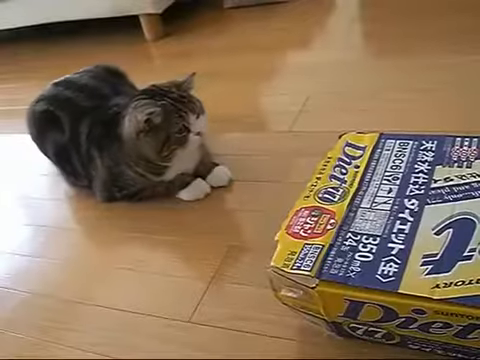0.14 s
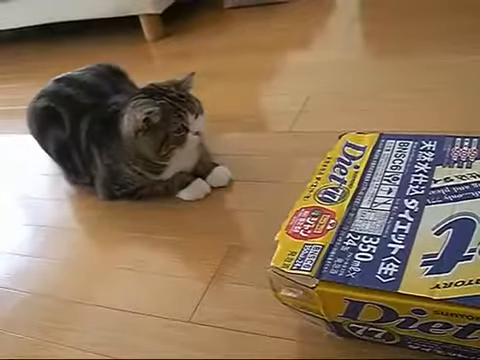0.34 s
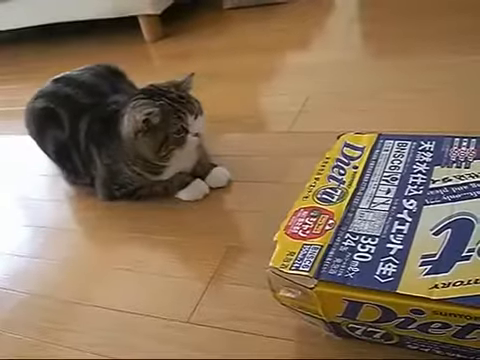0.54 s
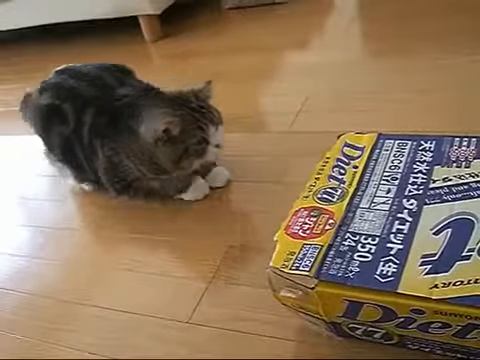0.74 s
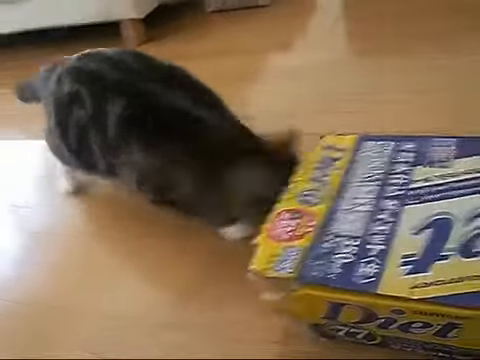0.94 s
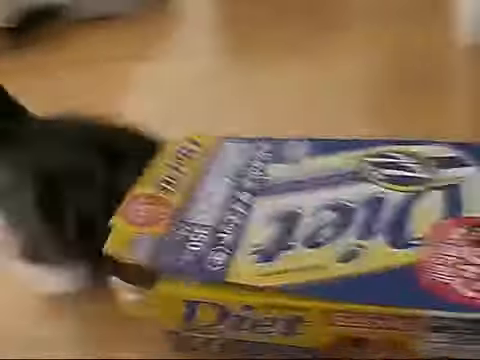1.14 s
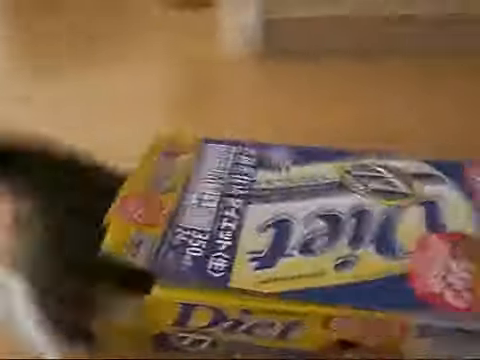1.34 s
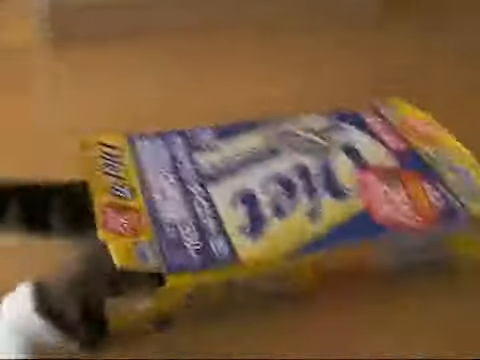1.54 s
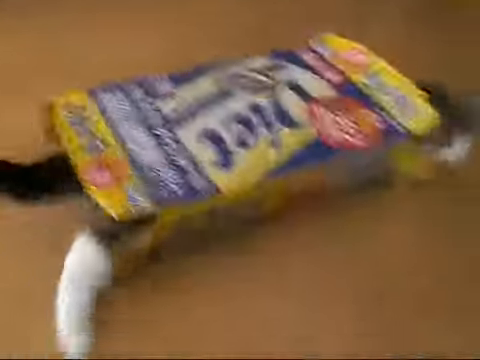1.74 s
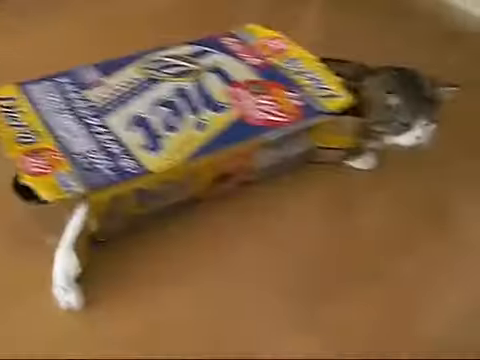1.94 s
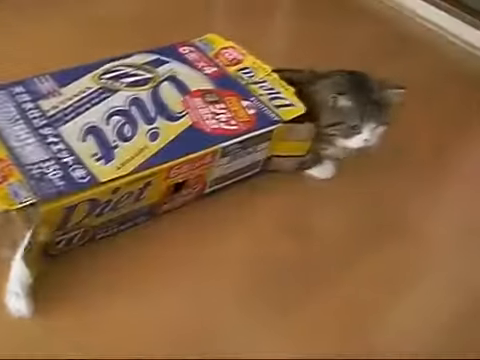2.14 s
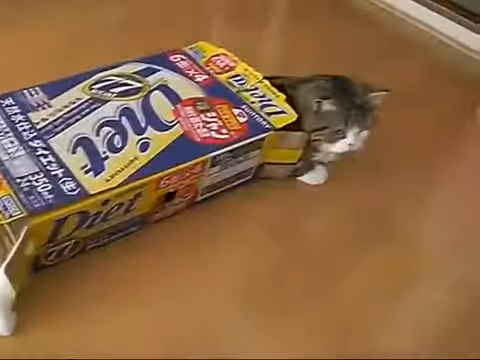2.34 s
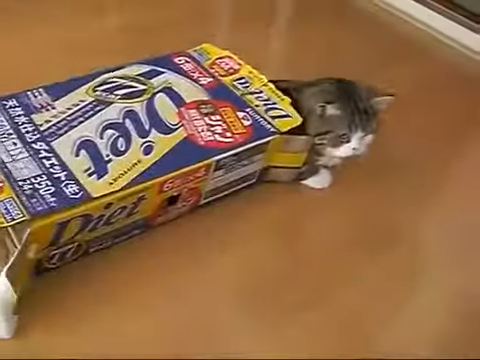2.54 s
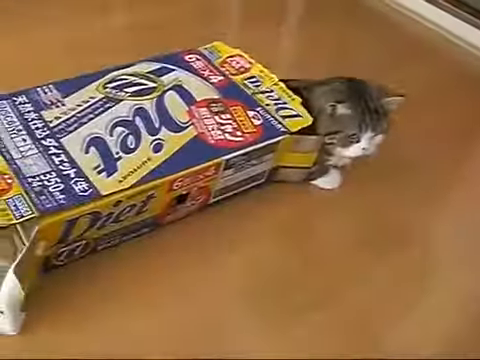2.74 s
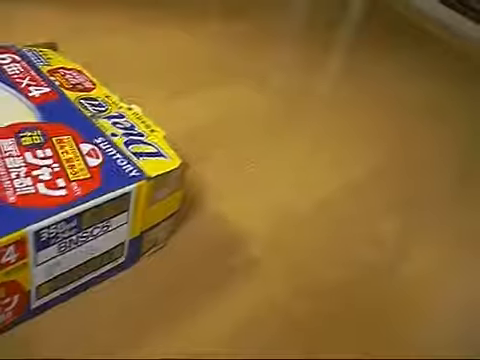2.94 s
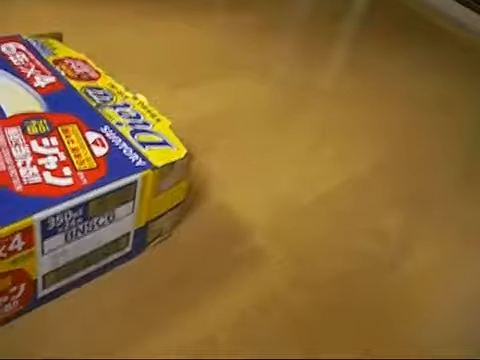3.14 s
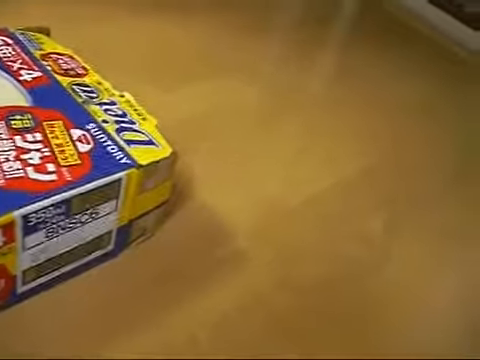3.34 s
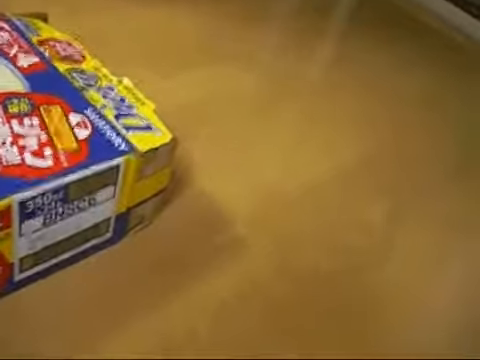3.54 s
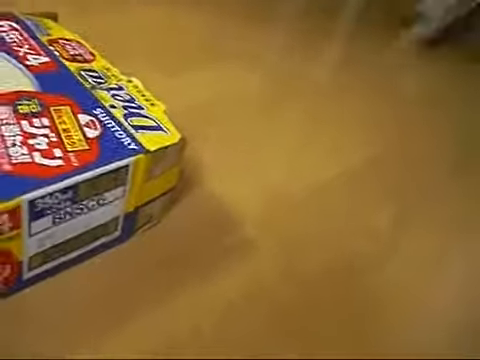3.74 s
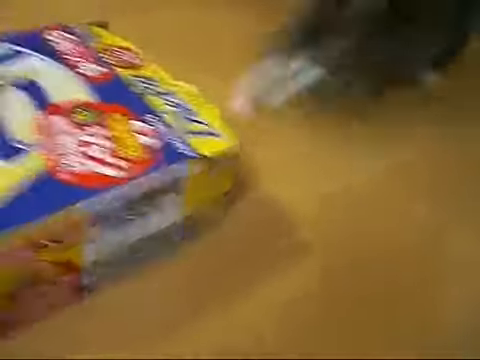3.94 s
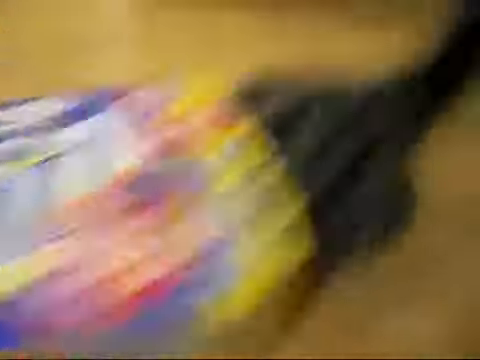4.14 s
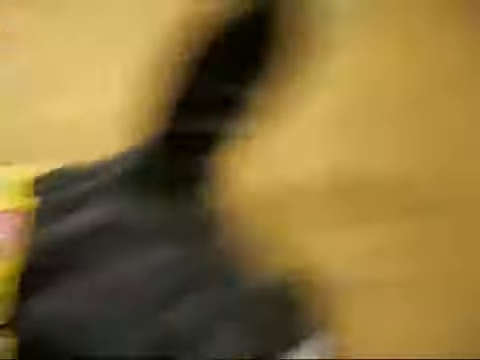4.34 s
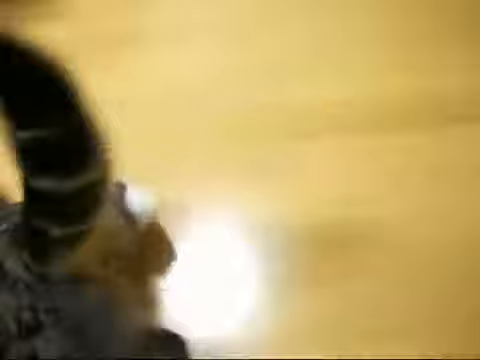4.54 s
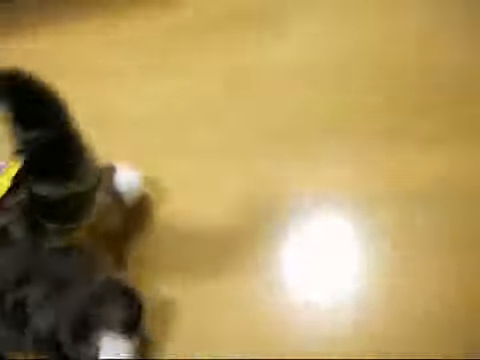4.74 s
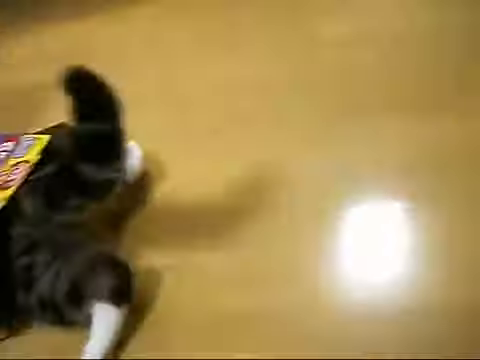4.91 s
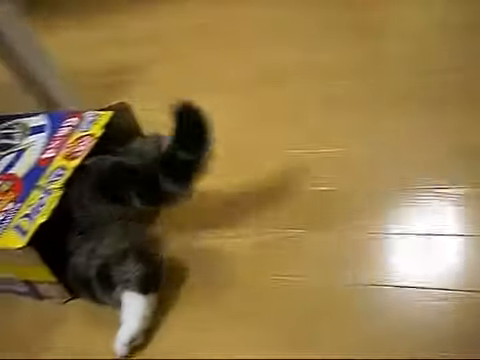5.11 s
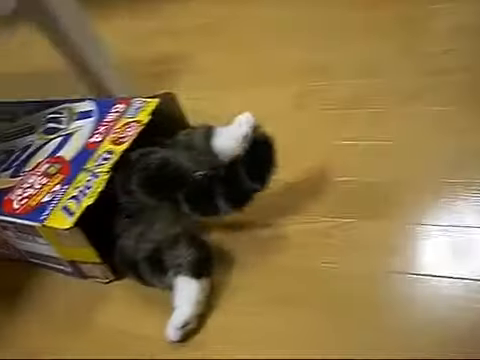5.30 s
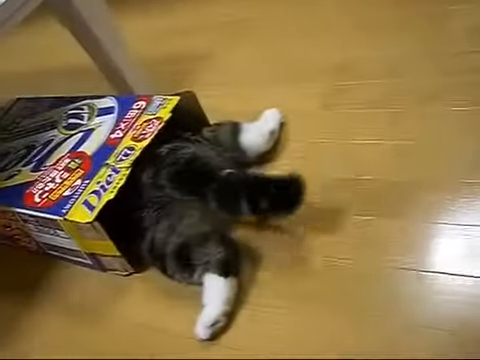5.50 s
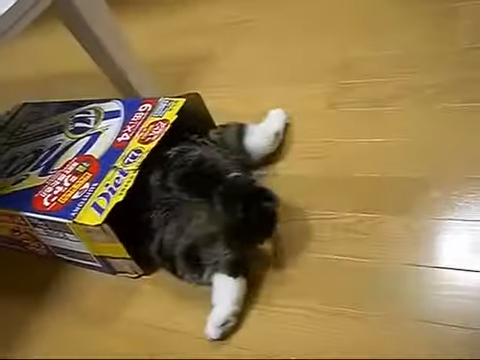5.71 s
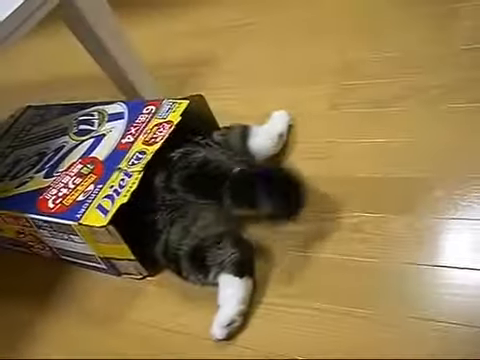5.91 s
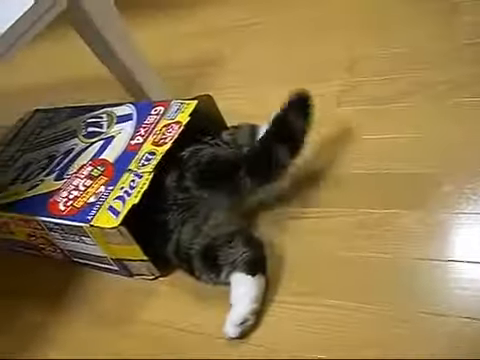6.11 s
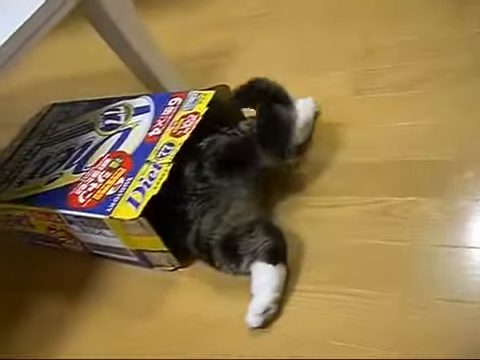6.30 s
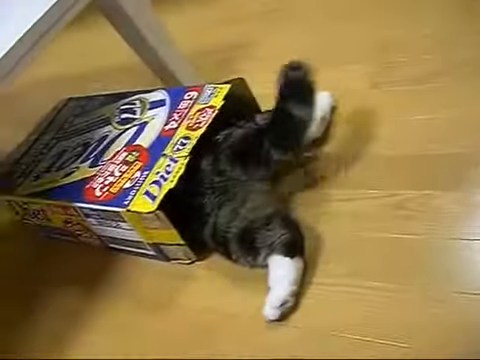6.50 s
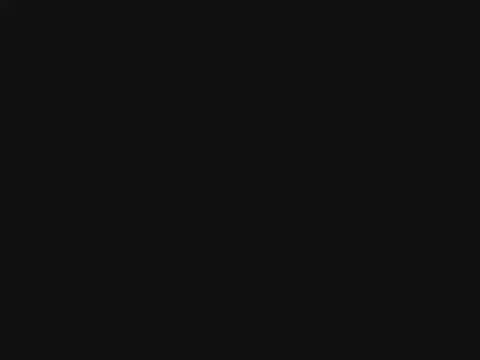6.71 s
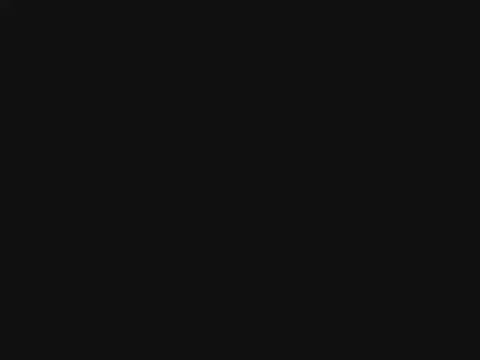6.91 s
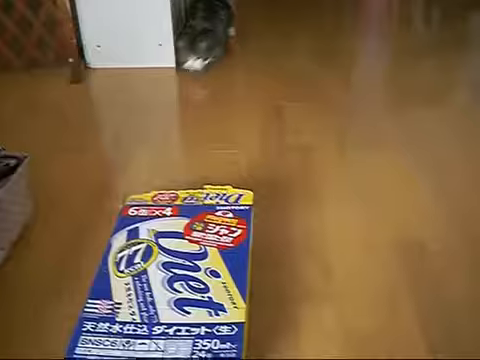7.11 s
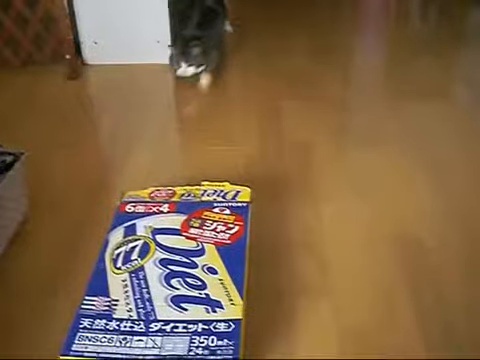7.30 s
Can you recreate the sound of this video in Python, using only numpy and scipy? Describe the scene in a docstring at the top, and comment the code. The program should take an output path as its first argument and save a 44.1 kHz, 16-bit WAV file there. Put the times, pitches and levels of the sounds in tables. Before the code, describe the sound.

A small, dry room with a wooden floor, heard through a modest camera microphone: soft low room noise, faint hum, hiss and rapid tiny treble ticks. About 1.1 s light cardboard taps begin; from 1.28 s a cat hits the box with hollow knocks, the loudest crack at 1.4 s, paws thudding below. The box rumbles and hisses along the varnish, surging to 1.8 s and dying by 2.3 s, with a last small knock. At 2.95 s the background changes abruptly. Soft paw thuds and small rustles come at 3.2 to 3.9 s, one firmer at 3.8 s. At 4.18 s a second hollow bang starts clustered knocks and a strong bright slide, fading from 4.9 to 5.4 s. Quiet room and hum remain, with a faint brush at 5.9 s. Silence from 6.7 to 7.2 s, then a quarter second of faint taps and rustle under pulsing high camera whine.

```python
"""A small furnished room with a wooden floor: a cat dives into a cardboard sleeve and slides it, twice.
Knocks ring the box, paws thud on the boards, sliding rumbles in the panels and hisses on the varnish.
A short, dull room tail sits well under the close sounds, with room tone and hums behind.
A small camera adds ticks, whines, fizz and treble notches to its microphone; both channels are alike.
It runs in three stretches, with silence before the brief last one, which holds only faint taps and rustle."""
import sys
import numpy as np
from scipy import signal
from scipy.fft import rfft, irfft, next_fast_len
from scipy.io import wavfile
from scipy.ndimage import uniform_filter1d

SR = 44100
rng = np.random.default_rng(int(sys.argv[2]) if len(sys.argv) > 2 else 0)


def unload_wav(signal):
    """Save mono or channel-first audio to the path in sys.argv[1] as 16-bit WAV at rate SR, clipped to [-1, 1]."""
    wavfile.write(
        sys.argv[1],
        SR,
        np.round(np.clip(np.atleast_2d(signal).T, -1, 1) * 32767).astype(np.int16),
    )


N = 328805
TIME = np.arange(N) / SR


def undb(db):
    """Amplitude of a level in dB."""
    return 10 ** (np.asarray(db) / 20)


def unit(x):
    """Scale to rms 1."""
    return x / np.sqrt(np.mean(x ** 2))


def colour(x, points):
    """Shape a spectrum by (f/Hz, level/dB) points on a log frequency axis; rms 1."""
    hz, db = np.transpose(points)
    size = next_fast_len(len(x))
    log_hz = np.log(np.arange(size // 2 + 1) * SR / size + 1)
    gain = undb(np.interp(log_hz, np.log(hz), db))
    return unit(irfft(rfft(x, size) * gain, size)[:len(x)])


def walk(rate):
    """Random levels held for 1 / rate seconds and smoothed twice; spread near 1."""
    hold = int(SR / rate)
    steps = np.repeat(rng.standard_normal(N // hold + 1), hold)
    return 1.3 * uniform_filter1d(uniform_filter1d(steps, hold), hold)[:N]


def during(start, end):
    """True from start until end, in seconds."""
    return (TIME >= start) & (TIME < end)


def filtered(x, order, hz, kind="low"):
    """Causal Butterworth filter."""
    return signal.sosfilt(signal.butter(order, hz, kind, fs=SR, output="sos"), x)


def smoothed(x, order, hz):
    """Low-pass without delay, so that the remainder is a clean upper band."""
    return signal.sosfiltfilt(signal.butter(order, hz, fs=SR, output="sos"), x)


def add(out, s, sound):
    """Lay a sound into the mix at s seconds."""
    i = int(s * SR)
    out[i:i + len(sound)] += sound[:N - i]


def swell(s, attack, hold, t60):
    """Level that rises, holds and dies away; peak 1, all times in seconds."""
    t = TIME - s
    decay = np.exp(-np.log(1000) * np.maximum(t - attack - hold, 0) / t60)
    return np.clip(t / attack, 0, 1) * decay


def ring(modes, weight, stretch):
    """Damped sines of a struck body; stretch scales the free ring times."""
    hz, db, t60 = np.transpose(modes)[:, :, None]
    t = TIME[:SR // 4]
    decay = np.exp(-np.log(1000) * t / (t60 * stretch))
    return (weight[:, None] * undb(db) * np.sin(2 * np.pi * hz * t) * decay).sum(axis=0)


def blow(modes, hz, stretch, octaves, direct):
    """A blow favours modes near its pitch and adds a first swing straight from the contact; peak 1."""
    scatter = rng.standard_normal((2, len(modes)))
    modes = np.array(modes)
    modes[:, 0] *= 1 + 0.02 * scatter[0]  # the mode pitches differ from blow to blow
    near = np.exp(-(np.log2(modes[:, 0] / hz) / octaves) ** 2) * undb(3 * scatter[1])
    body = ring(modes, near, max(stretch, .1))
    cycle = TIME[:len(body)] * hz - .75
    contact = np.sin(2 * np.pi * cycle) * np.exp(-(cycle / 0.54) ** 2)
    body = body / abs(body).max() + direct * contact
    push = np.hanning(int(.45 * SR / hz) + 3)  # a soft paw or flap pushes for a while
    body = np.convolve(body, push)
    return body / abs(body).max()


# modes of the cardboard panels: f/Hz, level/dB, free t60/s
BOX_MODES = [(170, -22.5, .07), (233, 4, 0.021), (261, 0, 0.04), (290, -3.5, 0.037), (354, 9.5, 0.11),
             (415, 10, 0.076), (486, -8, 0.017), (508, -3.5, 0.097), (566, -1.5, 0.066), (690, -6.5, 0.076),
             (780, -8, .04), (754, -11, 0.021), (850, 10, 0.034), (961, -1, 0.023), (1010, 1.5, 0.064),
             (1193, 5.5, .03), (1180, -1, 0.014), (1310, -9.5, 0.0067), (1520, -19, 0.022),
             (1690, -12.5, 0.032), (2160, -9, 0.045)]
# knocks on the box, then faint taps in the last stretch:
# t/s, ring peak level/dB, blow pitch f/Hz, crack peak level/dB, crack centre f/Hz
KNOCKS_AND_TAPS = [(1.087, -28.5, 870, -28.5, 6300), (1.111, -32, 750, -41.5, 3500),
                   (1.131, -25, 384, -55, 4800), (1.143, -40.5, 780, -30.5, 5400),
                   (1.234, -22.5, 430, -42.5, 5100), (1.271, -29.5, 537, -25, 8500),
                   (1.281, -5.5, 950, -22.5, 2400), (1.282, -11, 330, -28.5, 3800),
                   (1.295, -21.5, 660, -31.5, 4990), (1.34, -19.5, 660, -26.5, 4600),
                   (1.383, -9, 1100, -23, 3860), (1.393, 2, 770, -5, 5740), (1.403, -8.5, 385, -37, 4100),
                   (1.476, -18.5, 480, -25.5, 4000), (1.507, -20, 433, -12.5, 5800),
                   (1.526, -7.5, 330, -29, 5900), (1.702, -16, 1010, -30, 5600),
                   (1.729, -13.5, 1170, -15, 3230), (1.734, -9.5, 1100, -6.5, 3330),
                   (2.191, -31, 665, -55, 4600), (2.245, -30, 750, -44, 2200),
                   (3.228, -32.5, 465, -60, 5100), (3.66, -27, 474, -35, 7500),
                   (3.693, -23.5, 565, -33.5, 3000), (3.726, -28, 495, -33.5, 4140),
                   (3.797, -33.5, 470, -32, 3640), (3.908, -28, 457, -47, 6200),
                   (3.929, -29.5, 840, -26, 3060), (4.065, -23, 544, -39.5, 3300),
                   (4.093, -16.5, 490, -26, 4020), (4.103, -15, 377, -31.5, 4100),
                   (4.148, -23, 457, -24.5, 3920), (4.182, -4, 900, -3, 5240), (4.184, -8, 380, -19, 3800),
                   (4.196, -18, 724, -33, 4100), (4.223, -20.5, 550, -31.5, 5400),
                   (4.3, -19, 710, -14.5, 6500), (4.311, -11.5, 434, -19, 5700),
                   (4.337, -14.5, 620, -13, 4000), (4.362, -8, 422, -16.5, 5600),
                   (4.391, -11.5, 460, -15, 8800), (4.541, -17, 513, -17.5, 3600),
                   (5.949, -37.5, 700, -46, 2200), (7.266, -38, 1150, -42, 2200),
                   (7.281, -36.5, 616, -41, 2200), (7.326, -46, 810, -36, 5000),
                   (7.357, -38.5, 450, -35, 5000), (7.393, -36.5, 1120, -25.5, 3870),
                   (7.429, -51, 643, -37, 4500)]


def knocks_and_taps():
    """Each knock or tap is a short, damped ring of modes and a noise crack."""
    out, t = np.zeros(N), TIME[:SR // 20]
    snap = t / 0.00063 * np.exp(1 - t / 0.00066) + .12 * np.exp(-t / .005)
    for s, db, hz, crack_db, crack_hz in KNOCKS_AND_TAPS:
        body = blow(BOX_MODES, hz, .55, 1.1, 0.94)  # a touched panel keeps .55 of its ring time
        add(out, s - 0.28 / hz, undb(db) * body)  # starts early, by a share of one cycle
        hump = [(crack_hz / 6, -18), (crack_hz / 1.2, -3), (crack_hz, 0),
                (crack_hz * 1.38, -6), (crack_hz * 4, -26)]
        crack = snap * colour(rng.standard_normal(len(t)), hump)
        add(out, s, undb(crack_db) * crack / abs(crack).max())
    return out


def grit(scatter_db):
    """Dense friction grains of uneven size; the very largest are capped."""
    size_db = scatter_db * np.minimum(rng.exponential(size=N), 6)
    return rng.standard_normal(N) * undb(size_db)


def shaken(modes, weight):
    """Stick-slip grit drives a body whose ringing is damped by the rubbing; rms 1."""
    drive = grit(3.1) * undb(1.7 * walk(40))
    return unit(signal.fftconvolve(drive, ring(modes, weight, 0.44))[:N])


# spectrum of grit on varnish: f/Hz, level per Hz/dB (relative)
VARNISH_SPECTRUM = [(700, -29.5), (1300, 0.5), (1900, -7), (2500, -7.5), (2950, 0), (3400, -1),
                    (4000, -0.5), (5000, -3), (6200, -1.5), (7300, -6), (8600, -4), (10500, -8),
                    (12000, -11.5), (13500, -11), (15500, -14.5)]


def friction():
    """Rubbing shakes low panels, high panels and boards; finer grit hisses, dull and bright."""
    low = np.array(BOX_MODES)[:, 0] < 650
    # the weight of the cat pins the slowest panel motion to the floor
    low_panels = unit(filtered(shaken(BOX_MODES, low * 1.), 2, 200, "high"))
    high_panels = shaken(BOX_MODES, ~low * 1.)
    boards = shaken(BOARD_MODES, np.ones(len(BOARD_MODES)))
    hiss = colour(grit(2.2), VARNISH_SPECTRUM) * undb(.5 * walk(30))
    dull = smoothed(hiss, 2, 7500)
    bright = (hiss - dull) * undb(.9 * walk(60))
    dull = dull * undb(.9 * walk(49))
    return (low_panels / np.sqrt(2), high_panels / np.sqrt(2)), (dull, bright), boards


def tilt(bands, db):
    """Mix a low and a high band, lowering one and raising the other by db."""
    low, high = bands
    return low * undb(-db) + high * undb(db)


# two slides that gather speed and coast to rest, then a faint rustle;
# each: t/s, varnish hiss level/dB, panel rumble level/dB, before the tone settings below
SLIDE_LEVELS = [
    [(1.05, -64, -62), (1.2, -49, -52), (1.3, -41.5, -32.5), (1.37, -33.5, -31.5), (1.43, -44, -37.5),
     (1.52, -34.5, -32), (1.68, -32.5, -33), (1.77, -28.5, -32.5), (1.9, -37, -39.5), (2.05, -46.5, -46.5),
     (2.17, -58, -53.5), (2.4, -64, -66)],
    [(4.12, -54, -54), (4.17, -38, -44), (4.25, -28.5, -36), (4.35, -29.5, -32), (4.6, -27.5, -34.5),
     (4.76, -33.5, -35.5), (4.83, -33.5, -38.5), (4.89, -31.5, -41), (4.97, -37.5, -41.5),
     (5.15, -45.5, -46.5), (5.36, -58, -55), (5.5, -74, -80)],
    [(7.19, -68, -62), (7.36, -63, -65), (7.45, -52, -64)],
]
# one row per slide: panel tilt level/dB, hiss tilt level/dB, boards relative to panel rumble level/dB
SLIDE_COLOURS = [(3, 1, -22.5), (3, 2, -30.5), (3, -1, 0)]


def slides(panels, varnish, boards):
    """Sliding friction follows the drawn levels of panel rumble and varnish hiss."""
    out = np.zeros(N)
    for table, (tilt_db, shine_db, board_db) in zip(SLIDE_LEVELS, SLIDE_COLOURS):
        s, hiss_db, panel_db = np.transpose(table)
        rumble = tilt(panels, tilt_db) + undb(board_db) * boards
        rumble = undb(np.interp(TIME, s, panel_db)) * rumble
        hiss = undb(np.interp(TIME, s, hiss_db)) * tilt(varnish, shine_db)
        out += ((TIME > s[0]) & (TIME < s[-1])) * (rumble + hiss)
    return out


SCUFF_ATTACK_S = 0.0059
# shoves and scuffs on the box: onset t/s, hold t/s, panel level/dB, hiss level/dB, panel tilt level/dB
BOX_SHOVES = [(1.274, .03, -28.5, -44.5, -3.5), (1.393, 0.017, -28.5, -59, -3),
              (1.483, 0.033, -32, -45, -7.5), (1.732, 0.022, -35.5, -49, 2), (1.973, .06, -50.5, -66, 8),
              (2.238, 0.015, -45.5, -70, -0.5), (3.349, 0.062, -54.5, -54.5, 2.5),
              (3.658, .03, -41, -55, 0), (3.694, 0.039, -36, -52, 1), (3.757, 0.075, -41, -49, -1.5),
              (3.907, 0.031, -36.5, -50, -2.5), (3.986, 0.067, -53, -59.5, -4),
              (4.063, 0.024, -46.5, -56, 1), (4.084, 0.023, -39.5, -55.5, -1.5),
              (4.185, 0.0093, -22.5, -48, -0.5), (4.294, 0.081, -28.5, -39, -6)]


def shoves(panels, varnish):
    """Each shove is a short swell of the same panel and varnish friction."""
    out, scuffed = np.zeros(N), tilt(varnish, 1.5)
    for s, hold, panel_db, hiss_db, tilt_db in BOX_SHOVES:
        rub = undb(panel_db) * tilt(panels, tilt_db) + undb(hiss_db) * scuffed
        out += swell(s, SCUFF_ATTACK_S, hold, .2) * rub
    return out


# modes of the floorboards: f/Hz, level/dB, free t60/s
BOARD_MODES = [(78, -4, .15), (105, 17, 0.11), (123, -3.5, 0.11), (147, 10.5, 0.081), (178, -1.5, .1),
               (226, -4.5, 0.1)]
# paws on the boards: t/s, peak level/dB, pitch f/Hz, ring stretch [factor on t60]
PAW_THUDS = [(1.227, -17, 150, 0.3), (1.285, -17, 200.6, 0.67), (1.377, -22, 150.7, .6),
             (1.39, -16, 180.7, 0.73), (1.487, -21.5, 150, .7), (1.525, -17, 197, 0.78),
             (1.737, -28.5, 171, 0.75), (1.763, -44, 144.4, 0.65), (1.957, -36, 130, 0.54),
             (3.17, -40, 140, .9), (3.246, -34.5, 149, 1), (3.28, -37, 140, 1), (3.499, -25.5, 123, 2.5),
             (3.511, -26, 141, 1.4), (3.546, -30, 115, 0.88), (3.669, -30.5, 130, 1.1),
             (3.755, -23, 224, 0.87), (3.784, -13.5, 150, 1.2), (3.828, -27.5, 99.5, 1.4),
             (3.869, -28.5, 80, 1.3), (3.925, -36, 170, .8), (4.062, -36, 150, .8), (4.089, -28.5, 187, .8),
             (4.184, -23.5, 198, .8), (4.299, -19.5, 129, 1.2), (4.331, -19, 170, 0.83),
             (7.283, -34.5, 203, 0.5), (7.362, -43, 188, 0.81), (7.392, -33, 210, 0.51)]


def paws():
    """Soft landings thud in the floorboard modes near each pitch."""
    out = np.zeros(N)
    for s, db, hz, stretch in PAW_THUDS:
        add(out, s, undb(db) * blow(BOARD_MODES, hz, stretch, 0.37, 0.12))
    return out


def shudder(boards):
    """Boards rumble on after each paw, 15 dB under its thud peak."""
    level = sum(undb(db - 15) * swell(s, SCUFF_ATTACK_S, 0, 0.21) for s, db, *_ in PAW_THUDS)
    return level * boards


# rubbing, airy swish to low groan, and one short camera fizz at 7.291 s:
# t/s, length t/s, level/dB, centre f/Hz, width [octaves]
RUBS_AND_FIZZ = [(1.28, 0.041, -26, 240, .2), (1.397, 0.065, -25, 234.6, 0.25),
                 (1.522, 0.026, -17.5, 260, 0.38), (1.732, 0.017, -26, 2400, 0.55),
                 (2.24, 0.023, -47, 990, 0.52), (3.33, 0.016, -56, 10200, .2), (3.353, .02, -57, 10500, .2),
                 (3.391, 0.045, -46.5, 9850, 0.3), (3.406, 0.034, -44.5, 381, 0.1),
                 (3.686, 0.1, -47.5, 10500, 0.41), (3.687, 0.069, -33, 400, 0.099),
                 (4.259, 0.32, -32, 11000, .15), (4.44, 0.37, -36, 10800, 0.18),
                 (4.319, 0.033, -32.5, 3280, 0.096), (4.507, 0.083, -29, 343, .15),
                 (4.529, 0.026, -31.5, 3500, .15), (5.929, 0.087, -53.5, 900, .7),
                 (7.291, 0.014, -48, 8500, .25), (7.308, 0.17, -57, 2900, 0.15)]


def rubs_and_fizz():
    """Each rub, and the one camera fizz, is noise in one resonance that swells and fades."""
    out = np.zeros(N)
    for s, length, db, hz, octaves in RUBS_AND_FIZZ:
        sides = ((-3, -40), (-1, -4), (0, 0), (1, -4), (3, -40))
        hump = [(hz * 2 ** (side * octaves), fall_db) for side, fall_db in sides]
        shape = np.sin(np.pi * np.clip(TIME[:SR // 3] / length, 0, 1)) ** 1.1
        add(out, s, undb(db) * colour(rng.standard_normal(SR // 3), hump) * shape)
    return out


def room(dry):
    """A small furnished room answers with a short dull tail of decaying noise."""
    t = TIME[:SR // 2]
    tail = colour(rng.standard_normal(len(t)), [(60, -9), (300, 1.5), (3000, 4), (15000, -12)])
    t60_s, tail_db = .3, -17
    tail = tail * np.exp(-np.log(1000) * t / t60_s) * np.clip(t / 0.00099, 0, 1)
    tail = tail / np.sqrt(np.sum(tail ** 2))
    return undb(tail_db) * signal.fftconvolve(dry, tail)[:N]


# stretches of sound: start t/s, end t/s, first camera cycle t/s
STRETCHES = [(0, 2.95, .0252), (2.95, 6.717, 2.9582), (7.183, 7.456, 7.194)]
# quiet room and microphone hiss, one spectrum per stretch: f/Hz, level per Hz/dB (relative)
AIR_SPECTRA = [
    [(15, -46), (25, -10.5), (158, -3.5), (309, -6.5), (415, -2), (529, -7.5), (588, -6.5), (1150, -6),
     (4380, -19.5), (6720, -22), (9270, -29), (15000, -22)],
    [(25, -14.5), (64, -6), (120, -4.5), (250, -5.5), (450, -9.5), (900, -11.5), (1300, -15), (1600, -19),
     (3000, -21), (7000, -25.5), (15000, -27.5)],
    [(15, -31), (25, 3), (297, -0.5), (476, -9.5), (562, -1.5), (781, -18), (900, -17), (1510, -14.5),
     (7000, -26), (9100, -54), (15400, -120)],
]
# one value per stretch: rms level/dB before the swells
AIR_LEVELS = [-49.5, -53, -46]
# distant noise swells and fades: t/s, gain below 500 Hz level/dB, gain of 500-4000 Hz level/dB
DISTANT_SWELLS = [(0, 4.5, 3), (1, 5.5, -0.5), (2.3, 4, 0), (2.93, 6, -4.5), (2.97, 2, 2.5), (5.4, -0.5, 2),
                  (6.7, 1, 0.5), (7.2, -3.5, -5), (7.45, -9, 5)]
# steady hums: f/Hz, rms level/dB before a slight waver, start t/s, end t/s
HUMS = [(118.4, -65, 0, 6.717), (535, -65, 2.95, 5.1), (535, -58.5, 5.1, 6.717)]


def air():
    """Coloured noise of each stretch swells slowly in two bands, over wavering hums."""
    out = np.zeros(N)
    for (start, end, _), points, db in zip(STRETCHES, AIR_SPECTRA, AIR_LEVELS):
        out += during(start, end) * undb(db) * colour(rng.standard_normal(N), points)
    s, lows_db, mids_db = np.transpose(DISTANT_SWELLS)
    lows = smoothed(out, 1, 500)
    mids = smoothed(out, 1, 4000) - lows
    for band, db in ((lows, lows_db), (mids, mids_db)):
        gain = undb(np.interp(TIME, s, db) + walk(9))
        out += band * (gain - 1)  # the band itself is already in the sum
    for hz, db, start, end in HUMS:
        level = undb(db + .6 * walk(5)) * np.sqrt(2)
        out += during(start, end) * level * np.sin(2 * np.pi * hz * TIME)
    return out


# rings of one camera tick: f/Hz, width f/Hz, envelope peak level/dB
TICK_RINGS = [(4720, 920, -53), (9200, 1400, -51.5), (14230, 900, -46.5)]
# fizz around each tick pair: t/s after the first tick, level/dB
TICK_FIZZ = [(-.016, -72.5), (-.006, -59.5), (0, -55), (.004, -67), (.007, -57.5), (.014, -53.5),
             (.017, -74.5), (.024, -74)]


def camera_ticks():
    """In the first two stretches the camera ticks in pairs with fizz, 25 pairs a second."""
    cycle_s, pair_s, centre_s = .04, .007, .001
    out, t = np.zeros(N), TIME[:SR // 200]
    tick = sum(undb(db) * np.sin(2 * np.pi * hz * t) * np.exp(-((t - centre_s) * width * 2) ** 2)
               for hz, width, db in TICK_RINGS)
    fizz = colour(rng.standard_normal(N), [(11000, -33), (13200, -4.5), (14200, 2.0), (15000, -2)])
    lag, fizz_db = np.transpose(TICK_FIZZ)
    for start, end, first in STRETCHES[:2]:
        for s in np.arange(first, end - pair_s, cycle_s):
            size = undb(1.2 * rng.standard_normal(2))
            add(out, s - centre_s, size[0] * tick)
            add(out, s - centre_s + pair_s, size[1] * .7 * tick)
        since = (TIME - first - lag[0]) % cycle_s + lag[0]
        level = undb(np.interp(since, lag, fizz_db) + 2.5 * walk(60))
        out += during(start, end) * level * fizz
    return out


# camera whines: f/Hz, rms level/dB while on
WHINE_TONES = [(9400, -51.5), (12650, -53)]
# fizz beside the whines: t/s after they stop, level/dB
PAUSE_FIZZ = [(0, -48), (.003, -56), (.03, -61), (.068, -70), (.071, -54), (.08, -42.5)]


def camera_whine():
    """In the last stretch two camera whines pause for 14 ms in each 80 ms cycle, with fizz."""
    start, _, first = STRETCHES[2]
    since = (TIME - first) % .08
    whine = sum(undb(db) * np.sqrt(2) * np.sin(2 * np.pi * hz * TIME) for hz, db in WHINE_TONES)
    whine = whine * uniform_filter1d(1. * (since > .014), size=40)  # softened switching
    fizz = colour(rng.standard_normal(N), [(5000, -26), (7500, 1), (9000, -3), (11000, -11),
                                           (14000, -3), (15000, -6)])
    level = undb(np.interp(since, *np.transpose(PAUSE_FIZZ)))
    return (TIME >= start) * (whine + level * fizz)


# treble notches of the camera's microphone: f/Hz, width f/Hz
MIC_NOTCHES = [(4700, 670), (7880, 390), (9390, 340), (14090, 350)]


def microphone(sound):
    """The camera notches the treble in all but the last stretch; electronic hiss partly fills the notches."""
    notched = sound
    for hz, width in MIC_NOTCHES:
        notched = signal.lfilter(*signal.iirnotch(hz, hz / width, fs=SR), notched)
    heard = np.where(TIME < STRETCHES[2][0], notched, sound)
    hiss_points = [(2000, -7.5), (4500, -3.5), (8000, -1.5), (15000, -3)]
    return heard + undb(-61.5) * colour(rng.standard_normal(N), hiss_points)


def scene():
    """Close sounds in the room, then air, microphone and camera noise; silent between stretches."""
    panels, varnish, boards = friction()
    close = knocks_and_taps() + slides(panels, varnish, boards) + shoves(panels, varnish)
    close = close + paws() + shudder(boards) + rubs_and_fizz()
    close = filtered(close + room(close), 3, 110, "high")  # the microphone is weak in the lows
    heard = microphone(close + air()) + camera_ticks() + camera_whine()
    sounding = sum(during(start, end) for start, end, _ in STRETCHES)
    return np.tile(heard * sounding, (2, 1))


def record(dry):
    """Peaks clip at full scale, then the top is cut steeply above 15 kHz."""
    top_cut = signal.ellip(12, .3, 80, 15000, fs=SR, output="sos")
    return signal.sosfilt(top_cut, np.clip(dry, -1, 1))


dry = scene()
out = record(dry)
unload_wav(out)
```